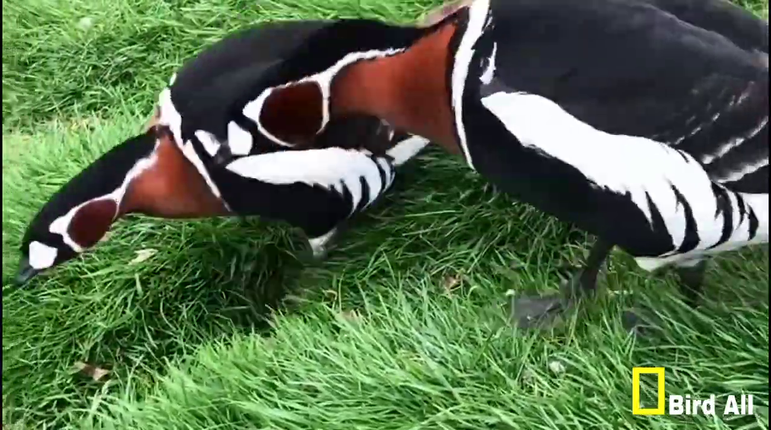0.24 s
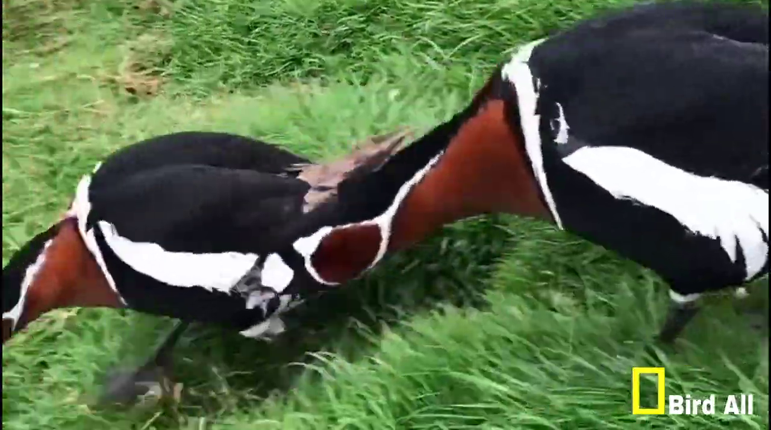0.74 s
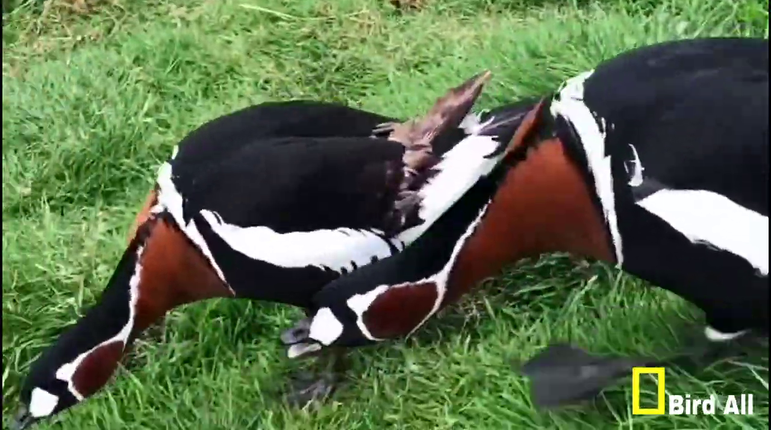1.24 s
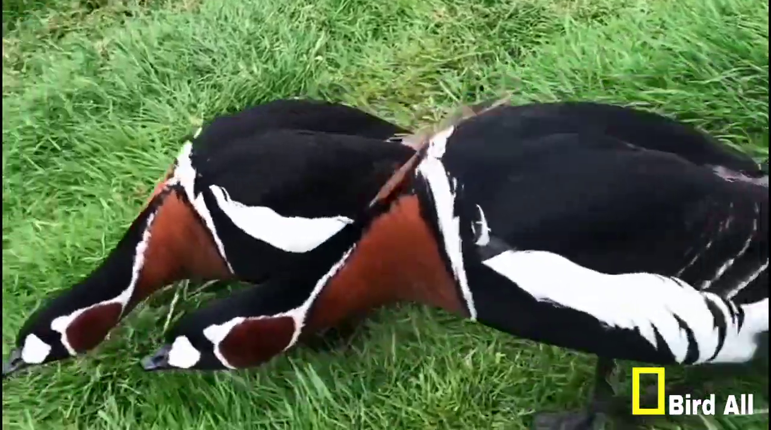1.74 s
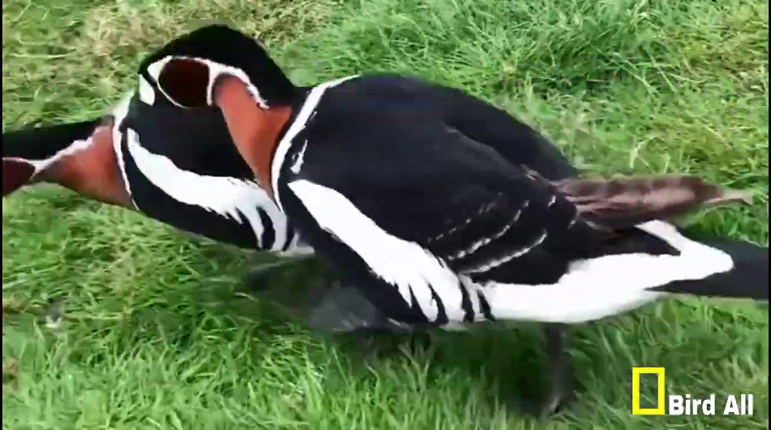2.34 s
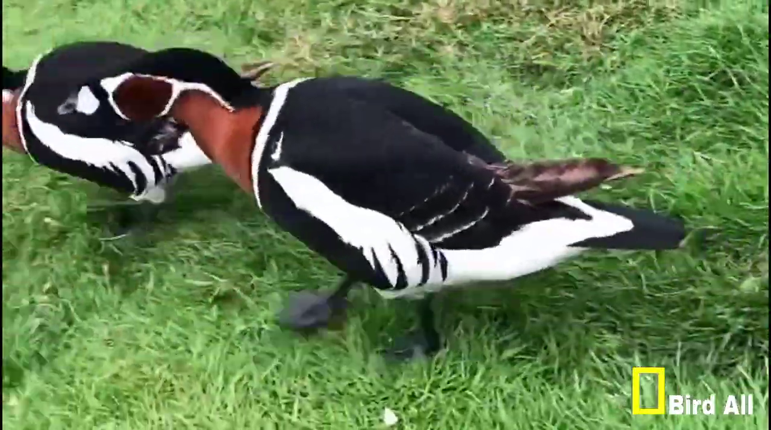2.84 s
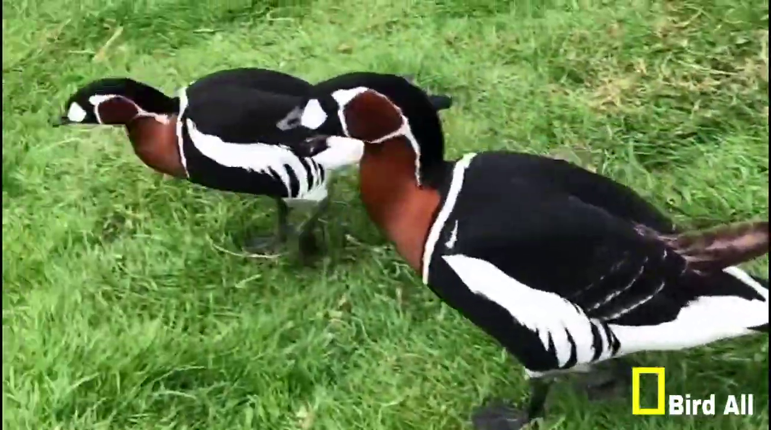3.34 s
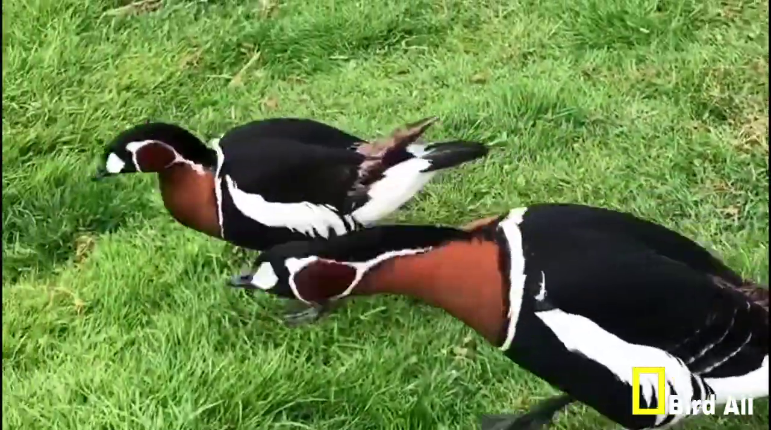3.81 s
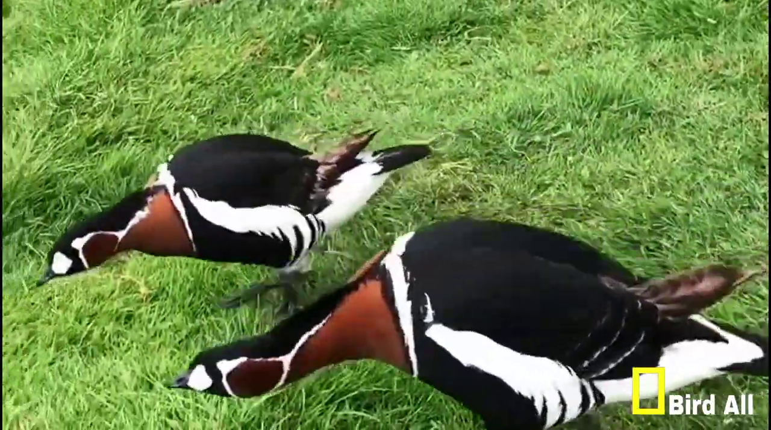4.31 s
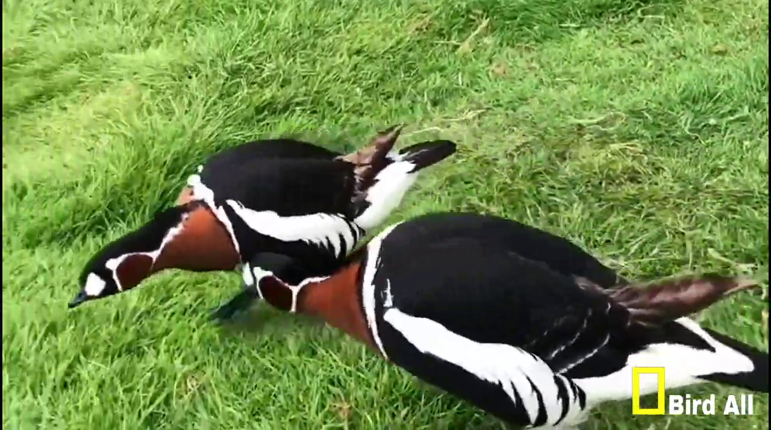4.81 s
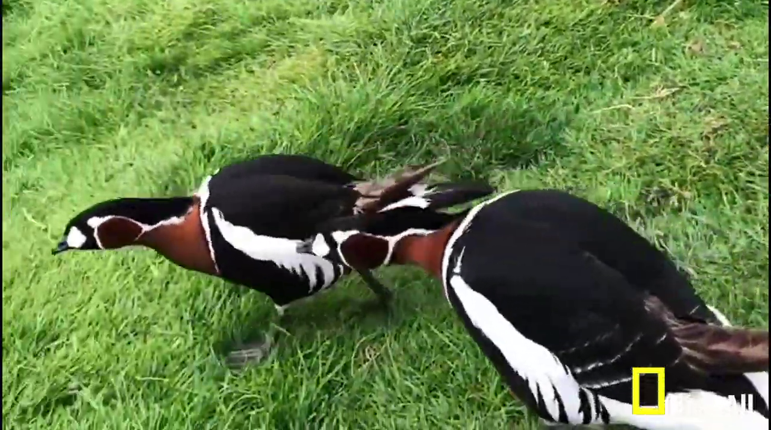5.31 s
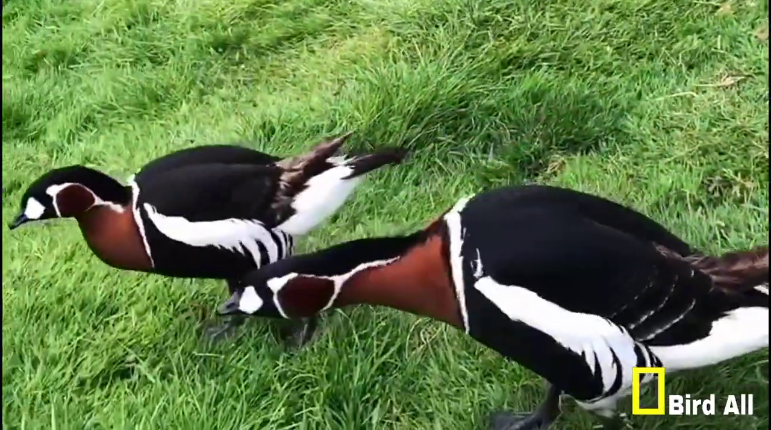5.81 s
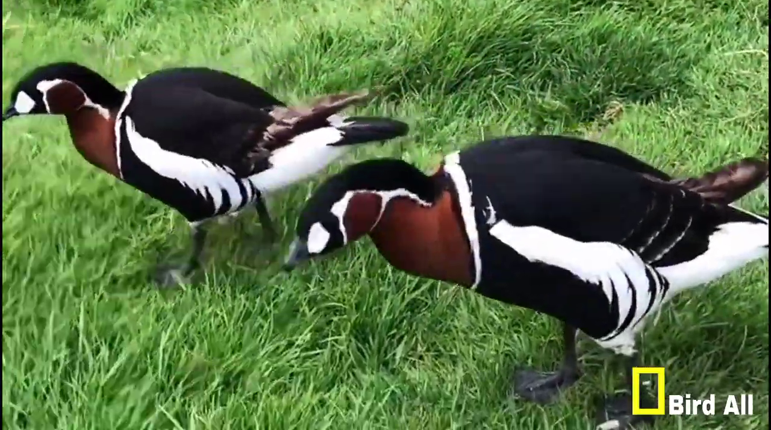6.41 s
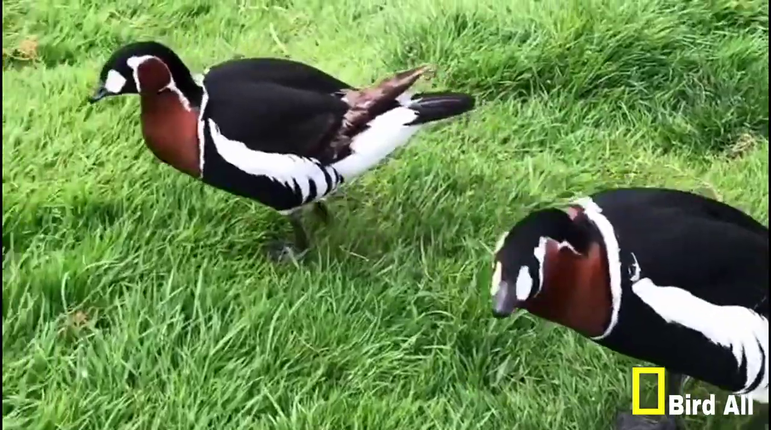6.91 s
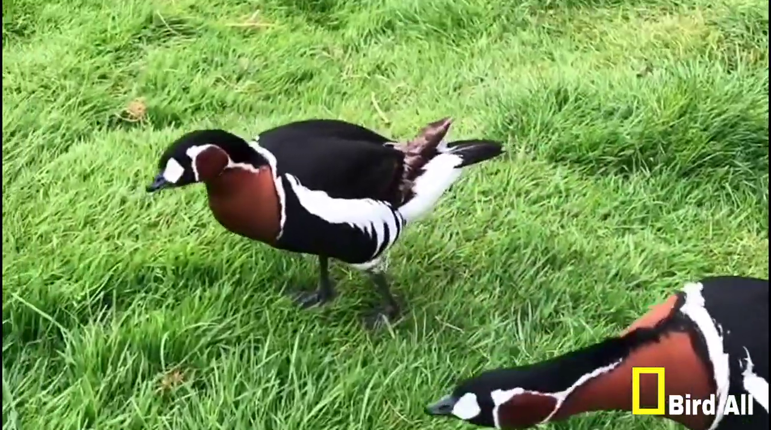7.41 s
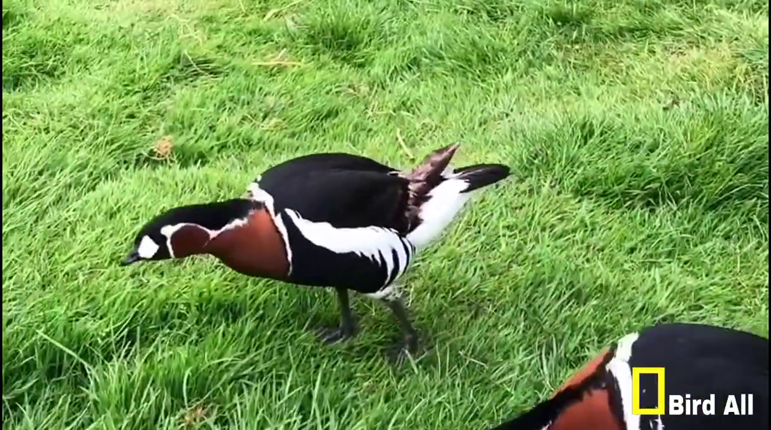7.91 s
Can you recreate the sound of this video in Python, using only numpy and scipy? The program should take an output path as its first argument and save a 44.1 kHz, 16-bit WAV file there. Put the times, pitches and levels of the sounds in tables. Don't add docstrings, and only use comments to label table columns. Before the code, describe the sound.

Sparse sharp goose yelps that break from buzz to falling whistle, low grunts and croaks answering, over distant traffic and woodland birdsong.

```python
import sys
import numpy as np
from scipy import signal
from scipy.fft import rfft, irfft, next_fast_len
from scipy.io import wavfile
from scipy.ndimage import uniform_filter1d

SR = 44100
rng = np.random.default_rng(int(sys.argv[2]) if len(sys.argv) > 2 else 0)


def inscribe(sig):
    pcm = np.round(np.clip(np.atleast_2d(sig).T, -1, 1) * 32767)
    wavfile.write(sys.argv[1], SR, pcm.astype(np.int16))


def amplitude_ratio(level_db):
    exponent = np.asarray(level_db, float) / 20
    return 10 ** exponent


N = 359415

# pitch_hz, level_db (per Hz)
TOWN_COLOUR = [(15, -34), (25, -35.5), (49, -11), (75, 5), (91, -5), (118, -8), (168, -8), (417, -19),
               (733, -19), (1640, -23), (4790, -22.5), (9110, -29.5), (11000, -31.5), (13600, -31.5),
               (15200, -58.5)]
# time_s, level_db
TWITTER_SWELL = [
    (0, -1.5),
    (.8, 4.5),
    (1, 7),
    (2.3, 9),
    (2.9, 3),
    (3.3, -2),
    (4.199, -3.5),
    (5.199, -2),
    (6.9, -2.5),
    (8.15, 4),
]
# start_s, level_db
TWO_NOTE_CALLS = [
    (1.39, -28.5),
    (1.575, -32),
    (1.765, -32),
]
# delay_s, length_s, start_hz, end_hz, level_db (relative), echo_db (relative)
FIRST_NOTE = (0, .035, 8080, 7840, -1.5, -15)
SECOND_NOTE = (.028, .08, 7690, 6680, 0, -8)
# start_s, length_s, start_hz, end_hz, level_db
CLIMBING_TRILL = [
    (2.072, .062, 3373, 3920, -35),
    (2.137, 0.062, 3456, 3850, -35.5),
    (2.204, 0.12, 3675, 4100, -37),
    (2.293, 0.037, 3935, 4013, -35.5),
    (2.387, .079, 3820, 4160, -42.5),
]
# start_s, length_s, start_hz, end_hz, level_db
DEEP_BIRDS = [(1.657, .057, 3070, 4700, -51), (1.855, .055, 3164, 4870, -43),
              (2.031, .041, 2985, 4000, -44.5), (.359, 0.31, 2226, 2650, -61.5),
              (.472, 0.28, 4630, 4340, -58.5), (.892, .09, 4160, 5210, -46.5),
              (2.147, 0.52, 2768, 2698, -56), (2.569, 0.061, 2790, 3285, -51),
              (2.76, 0.038, 4320, 3070, -49), (2.72, 0.054, 4660, 5120, -54),
              (3.45, 0.025, 3410, 2300, -60), (3.5, .07, 3130, 3300, -66), (2.849, .052, 6355, 6170, -60),
              (3.845, 0.2, 5530, 5380, -59), (4.079, 0.045, 6550, 6430, -59.5),
              (4.316, 0.24, 4400, 4730, -62), (5.042, 0.088, 6000, 5740, -62.5),
              (5.411, .03, 5050, 4700, -59.5), (6.348, 0.132, 2690, 2510, -62.5),
              (6.559, 0.09, 2110, 1975, -64.5), (7.034, 0.11, 2630, 3285, -54.5),
              (7.59, 0.061, 2147, 2130, -58), (7.607, 0.058, 3332, 3337, -52.5),
              (8.02, 0.074, 2650, 3090, -52.5)]
# start_s, length_s, start_hz, end_hz, level_db
EDGE_BIRDS = [(.448, .075, 7940, 5040, -56), (.497, .049, 5250, 4250, -51.5), (.85, .1, 3870, 3700, -35),
              (.99, 0.12, 4470, 4447, -32.5), (1.07, 0.22, 3547, 3580, -47.5),
              (2.79, 0.045, 3160, 3010, -44.5), (2.889, 0.022, 7606, 6500, -54),
              (4.5, 0.054, 6080, 5390, -56), (5.17, 0.04, 4680, 4600, -57), (5.82, 0.033, 6640, 5100, -57),
              (6.154, .049, 3890, 3907, -60.5), (6.158, 0.093, 2896, 2895, -63),
              (6.79, 0.115, 2307, 2000, -56.5), (7.12, 0.044, 5520, 6050, -57.5),
              (7.2, 0.12, 2800, 2550, -55), (7.207, 0.029, 1970, 1860, -57), (7.4, .073, 4200, 3970, -52),
              (8.08, 0.06, 4380, 4310, -55.5)]
# start_s, length_s, start_hz, end_hz, level_db
OPEN_BIRDS = [(.08, .037, 6540, 7970, -55), (.804, .096, 6440, 7710, -41.5), (1.354, .029, 8400, 7900, -39),
              (4.15, 0.034, 7400, 7540, -54), (4.84, .025, 4040, 3645, -53), (4.865, 0.03, 3620, 3725, -55),
              (5.059, 0.68, 6970, 7140, -58), (5.51, 0.038, 3850, 3885, -52),
              (5.558, .04, 8040, 7290, -59.5), (5.581, 0.062, 6840, 6840, -51.5),
              (5.728, .07, 7300, 6700, -55), (5.86, 0.038, 5100, 4780, -52), (5.91, .08, 4770, 5510, -54.5),
              (5.864, .055, 6940, 6350, -59), (5.96, 0.03, 3510, 4620, -58), (6.14, 0.07, 6940, 7030, -53),
              (6.22, 0.13, 7160, 7820, -56), (6.396, 0.0226, 4670, 5100, -53.5),
              (6.485, 0.022, 5920, 3680, -51.5), (6.504, 0.097, 3640, 3585, -58),
              (6.79, 0.0666, 6200, 5700, -56), (6.855, 0.041, 5450, 4970, -57),
              (5.85, 0.0377, 163, 147, -54.5), (8.086, 0.0326, 688, 680, -56)]
CHIP_TIMES = [5.838, 5.869, 5.903, 5.935]
# length_s, start_hz, end_hz, level_db
CHIP_SHAPE = (0.13, 4702, 4150, -60)
# pitch_hz, level_db
YELP_THROAT = [(350, -22), (600, -25), (1690, 5.5), (2640, -9), (3460, -3.5), (3950, -16.5), (4650, 0.5),
               (5040, -2.5), (8870, -17), (12800, -32.5), (15000, -41.5)]
# start_s, rasp_s, arch_s, slide_s, top_hz
ARCHED_YELPS = [
    (.777, .047, .055, 0.074, 1749),
    (3.731, 0.036, .051, .052, 1710),
    (7.295, .007, .041, .043, 1549),
]
# start_s, rasp_s, whistle_s, tail_s, lands_hz (after the step)
STEPPED_YELPS = [
    (1.264, .044, 0.053, 0.031, 1224),
    (4.185, .044, 0.038, 0.038, 1188),
    (4.923, .043, 0.04, .043, 1333),
    (7.819, .031, 0.025, 0.067, 1313),
]
# pitch_hz, level_db
GRUNT_THROAT = [(200, -0.5), (300, -5.5), (500, -13), (900, -9.5), (1400, -5.5), (1750, -3.5), (2400, -5.5),
                (3300, -18.5), (4100, -20.5), (5600, -16.5), (7100, -13), (9000, -19.5), (14000, -41.5)]
# start_s, rise_s, fall_s, top_flap_hz, level_db
CLEAR_GRUNTS = [
    (.915, .04, .1, 214, -36),
    (1.144, .07, 0.052, 231.6, -33.5),
    (1.568, .025, 0.11, 296, -27.5),
    (4.748, .034, .066, 304.5, -32),
    (7.72, .045, 0.055, 246, -37),
]
# start_s, rise_s, fall_s, top_flap_hz, level_db
HOARSE_CROAKS = [
    (3.96, 0.049, 0.16, 275.8, -32.5),
    (7.462, 0.065, 0.087, 265, -33),
]
# start_s, peak_db
FOOT_TICKS = [
    (2.372, -31.5),
    (2.689, -35.5),
    (6.1408, -58),
]
# start_s, length_s, whistle_hz, flap_hz, level_db
FAR_BARKS = [
    (2.866, 0.04, 970, 260, -51.5),
    (3.027, 0.063, 990, 263, -49.5),
    (3.171, 0.09, 1900, 260, -53.5),
    (3.261, 0.063, 1405, 240.6, -52.5),
    (3.438, 0.035, 1203, 271, -52.5),
    (3.663, 0.027, 1140, 260, -50),
]


def level(x, db):
    return x * amplitude_ratio(db) / np.sqrt(np.mean(x ** 2) + 1e-20)


def colour(table, hz):
    f, db = np.transpose(table)
    return np.interp(np.log(hz), np.log(f), db)


def walk(rate_hz, size=N):
    at = np.arange(size) * rate_hz / SR + rng.random()
    points = int(at[-1]) + 2
    return 1.297 * np.interp(at, np.arange(points), rng.standard_normal(points))


def add(out, start_s, x):
    i = int(start_s * SR)
    out[i:i + len(x)] += x[:N - i]


def echo(x, t60_s, rise_s):
    t = np.arange(int(t60_s * SR)) / SR
    tail = rng.standard_normal(len(t)) * amplitude_ratio(-60 * t / t60_s) * np.minimum(t / rise_s, 1)
    return signal.fftconvolve(x, tail / np.sqrt(np.sum(tail ** 2)))[:N]


def butter(x, order, hz, kind="low"):
    return signal.sosfilt(signal.butter(order, hz, kind, fs=SR, output="sos"), x)


def town():
    size = next_fast_len(N, True)
    hz = np.linspace(1, SR / 2, size // 2 + 1)
    white = rfft(rng.standard_normal((2, size))) * amplitude_ratio(colour(TOWN_COLOUR, hz))
    swell = walk(0.23)
    twitter_db = np.interp(np.arange(N) / SR, *np.transpose(TWITTER_SWELL))
    out = 0
    for centre_hz in 25 * 2 ** np.arange(0, 9.5, .5):
        band = np.cos(np.pi * np.clip(np.log2(hz / centre_hz), -.5, .5))
        drift_db = twitter_db * (2300 < centre_hz < 6500)
        moving_db = drift_db + .5 * swell + 1.1 * walk(2.1) + 1.0 * walk(9)
        out = out + amplitude_ratio(moving_db) * irfft(white * band, size)[:, :N]
    return out * amplitude_ratio(-51.5) / np.std(out[0])


def notes():
    calls = []
    for s, db in TWO_NOTE_CALLS:
        for delay_s, length_s, hz0, hz1, rel_db, echo_db in (FIRST_NOTE, SECOND_NOTE):
            calls.append((s + delay_s, length_s, hz0, hz1, db + rel_db, db + echo_db))
    chips = [(s, *CHIP_SHAPE) for s in CHIP_TIMES]
    groups = (CLIMBING_TRILL, -9), (DEEP_BIRDS, 0.5), (EDGE_BIRDS, -8), (OPEN_BIRDS + chips, -19)
    return calls + [(*row, row[-1] + echo_db) for rows, echo_db in groups for row in rows]


def crowd():
    chirps = []
    for s, d, f, g, b in rng.random((260, 5)):
        hz = 2800 + 4200 * f
        chirps.append((8 * s, .012 + .03 * d, hz, hz * (.65 + .7 * g), -74 + 11 * b, -76))
    return chirps


def songbirds():
    trees_t60_s, hedge_t60_s, near_t60_s = 2.06, 0.55, .07
    hedge_db = 1
    direct, fed = np.zeros(N), np.zeros(N)
    for s, length_s, hz0, hz1, direct_db, echo_db in notes() + crowd():
        u = np.linspace(0, 1, int(length_s * SR))
        hz = hz0 + (hz1 - hz0) * u
        flutter = walk(250, size=len(u))
        shape = np.minimum(1, np.minimum(u / .1, (1 - u) / .3)) * amplitude_ratio(3 * walk(60, size=len(u)))
        clear = shape * np.sin(2 * np.pi * np.cumsum(hz * (1 + .004 * flutter)) / SR)
        blurred = shape * np.sin(2 * np.pi * np.cumsum(hz * (1 + .011 * flutter)) / SR)
        add(direct, s, amplitude_ratio(direct_db + 3.5) * clear)
        add(fed, s, amplitude_ratio(echo_db) * blurred * np.sqrt(trees_t60_s / 7 / length_s))
    sides = []
    for _ in range(2):
        near = 0.55 * direct + .8 * echo(direct, near_t60_s, 0.00097)
        far = echo(fed, trees_t60_s, 0.017) + amplitude_ratio(hedge_db) * echo(fed, hedge_t60_s, .004)
        sides.append(near + far)
    return sides


def pipe(throat, hz):
    ripple_db, spacing_hz = 1.5, 847.3
    return amplitude_ratio(colour(throat, hz) + ripple_db * np.cos(2 * np.pi * hz / spacing_hz)) * (hz < .4 * SR)


def breath(throat, size):
    white = rfft(rng.standard_normal(size))
    return level(irfft(white * pipe(throat, np.linspace(1, SR / 2, len(white))), size), 0)


def syrinx(whistle_hz, flap_hz, rasp, throat, tilt_db, ring_ms, chest_db, breath_db):
    size = len(whistle_hz)
    flap = np.cumsum(flap_hz * (1 + .012 * walk(250, size=size))) / SR
    cycle = flap.astype(int)
    since = (flap - cycle) / flap_hz
    slack = np.clip((1550 - whistle_hz) / 350, 0, 1)
    free = np.cumsum(whistle_hz * (1 + (.003 + .022 * slack) * walk(500, size=size))) / SR
    opening = np.minimum(since / 0.0009, 1)
    closing = np.minimum((1 / flap_hz - since) / 0.00035, 1)
    puff = np.exp(-since / (ring_ms / 1000)) * opening * closing
    clean = chopped = 0
    for k in range(1, 17):
        hz = k * whistle_hz
        gain = pipe(throat, hz) * amplitude_ratio(tilt_db * np.log2(k))
        luck = rng.standard_normal((cycle[-1] + 1, 2))[cycle].T
        start = rng.random()
        waver = amplitude_ratio((1 + 3.5 * slack) * walk(130, size=size))
        clean = clean + gain * waver * np.sin(2 * np.pi * (k * free + start))
        ringing = np.sin(2 * np.pi * (hz * (1 + .012 * luck[1]) * since + start))
        chopped = chopped + gain * amplitude_ratio(1.7 * luck[0]) * ringing
    air = breath(throat, size)
    chopped = level(chopped * puff, 0) + level(air * puff, breath_db)
    chopped = butter(chopped, 4, 1000, "high") + amplitude_ratio(chest_db) * np.sin(2 * np.pi * flap)
    smooth = np.sqrt(uniform_filter1d(clean ** 2, int(.006 * SR)) + 1e-12)
    whistle = clean / smooth + amplitude_ratio(-21 + 8 * slack) * air
    return np.sqrt(rasp) * chopped + np.sqrt(1 - rasp) * whistle


def yelp(rasp_s, steps_s, hz, db, tilt_db, tail_s, slide_s):
    knee, knee_hz, end_hz = .62, 910, 720
    knee_drop_db, end_drop_db = -10, -28
    slide_tilt_db, end_tilt_db = -0.6, -3
    hold_s = max(tail_s - slide_s, 1e-4)
    slide_s = tail_s - hold_s
    at = np.cumsum([0, *steps_s, hold_s, knee * slide_s, (1 - knee) * slide_s])
    t = np.arange(0, at[-1], 1 / SR)
    hz = np.interp(t, at, [*hz, hz[-1], knee_hz, end_hz])
    tilt_db = np.interp(t, at, [*tilt_db, slide_tilt_db, slide_tilt_db / 2, end_tilt_db])
    db = [*db, db[-1], db[-1] + knee_drop_db, db[-1] + end_drop_db]
    gain = np.where(t < at[1], np.interp(t, at, amplitude_ratio(np.array(db))), amplitude_ratio(np.interp(t, at, db)))
    gain = gain * np.clip(np.minimum(t / 0.00033, (at[-1] - t) / 0.0022), 0, 1)
    rasp = np.interp(t, [rasp_s - .004, rasp_s + 0.0072], [1, 0])
    flap_hz = np.interp(t, [0, rasp_s], [260, 285.7])
    return gain * syrinx(hz, flap_hz, rasp, YELP_THROAT, tilt_db, ring_ms=1.9, chest_db=-23, breath_db=-9.5)


def arching_goose():
    attack_s, drop_s, lands_hz = .009, .007, 1313
    top_at = .7
    out = np.zeros(N)
    for s, rasp_s, arch_s, slide_s, top_hz in ARCHED_YELPS:
        effort = top_hz / 1720
        octaves = np.log2(effort)
        db = -10.5 - 7 * octaves
        steps_s = [attack_s, top_at * arch_s - attack_s, (1 - top_at) * arch_s, drop_s]
        hz = [top_hz * .86 * effort ** 1.8, top_hz * 0.94, top_hz, top_hz * .88, lands_hz]
        levels_db = [db - 20, db - 3.5 + 25 * octaves, db, db + 1.5, db - 1.5]
        tilts_db = [0, -1, -1, -2, -0.6]
        add(out, s, yelp(rasp_s, steps_s, hz, levels_db, tilts_db, slide_s, slide_s))
    return out


def stepping_goose():
    attack_s, break_s, drop_s, slide_s = .009, 0.0064, .005, .042
    whistle_hz, bulge_hz, sags_to_hz = 1711, 41, 1489
    out = np.zeros(N)
    for s, rasp_s, whistle_s, tail_s, lands_hz in STEPPED_YELPS:
        db = -7.5 + 60 * (whistle_s - .042)
        rasp_hz = 1970 + 6000 * (rasp_s - .043)
        land_db = -7.5 + 131 * (tail_s - .04)
        steps_s = [attack_s, rasp_s - attack_s - break_s / 2, break_s, whistle_s / 2, whistle_s / 2, drop_s]
        middle_hz = (whistle_hz + sags_to_hz) / 2 + bulge_hz
        hz = [rasp_hz] * 3 + [whistle_hz, middle_hz, sags_to_hz, lands_hz]
        levels_db = db + np.array([-20, -2.5, -2.5, -3, 0, -1, land_db])
        tilts_db = [1] * 3 + [1.5] * 2 + [-2] * 2
        add(out, s, yelp(rasp_s, steps_s, hz, levels_db, tilts_db, tail_s, slide_s))
    return out


def grunt(flap_hz, throat_hz, shake):
    size = len(flap_hz)
    flap = np.cumsum(flap_hz * (1 + shake * walk(200, size=size))) / SR
    stretch = 1750 / throat_hz * (flap_hz.max() / flap_hz) ** 0.14
    ring_db, ring_width_hz = 8, 230
    out = 0
    for k in range(1, 27):
        hz = k * flap_hz
        throat_db = colour(GRUNT_THROAT, hz * stretch if k > 2 else hz)
        gain = amplitude_ratio(throat_db + 2 * walk(50, size=size)) / (1 + (hz / 6500) ** 6)
        gain = gain * amplitude_ratio(ring_db * np.exp(-((hz * stretch - 1750) / ring_width_hz) ** 2))
        out = out + gain * np.sin(2 * np.pi * (k * flap + 0.12 * rng.standard_normal()))
    puffs = breath(GRUNT_THROAT, size) * np.exp(-(flap % 1) / .2)
    puffs = butter(puffs, 2, 2200, "high")
    return (level(out, 0) + level(puffs, -16)) * amplitude_ratio(1.8 * walk(180, size=size))


def grunts_and_croaks():
    linger_db = 21
    out = np.zeros(N)
    calls = [(*g, .006) for g in CLEAR_GRUNTS] + [(*c, .022) for c in HOARSE_CROAKS]
    for s, rise_s, fall_s, top_hz, db, shake in calls:
        t = np.arange(-rise_s, fall_s, 1 / SR)
        flap_hz = top_hz - np.where(t < 0, 16000, 8500) * t ** 2
        loss_db = np.where(t < 0, 3500, 1500 * (top_hz / 250) ** 8) * t ** 2
        loss_db = linger_db * np.tanh(loss_db / linger_db)
        edges = np.clip(np.minimum((t + rise_s) / 0.0041, (fall_s - t) / 0.0091), 0, 1)
        throat_hz = 1620 * (flap_hz / top_hz) ** .6 * max(top_hz / 268, 1) ** 1.6
        tired_shake = shake * (2.5 + (loss_db / 7) ** 2)
        add(out, s, amplitude_ratio(db - loss_db) * edges * grunt(flap_hz, throat_hz, tired_shake))
    return out


def ticks():
    out = np.zeros(N)
    for s, db in FOOT_TICKS:
        snap = np.diff(rng.standard_normal(400)) * np.exp(-np.arange(399) / 150.0)
        add(out, s, amplitude_ratio(db - 6.5) * snap)
    return out


def far_geese():
    out = np.zeros(N)
    for s, length_s, hz, flap_hz, db in FAR_BARKS:
        swell = np.hanning(int(length_s * SR)) ** 0.075
        steady = np.ones(len(swell))
        bark = syrinx(hz * steady, flap_hz * steady, 0.75, GRUNT_THROAT, -2.8,
                      ring_ms=1.5, chest_db=-36.5, breath_db=7)
        add(out, s, swell * amplitude_ratio(db) * bark)
    return echo(butter(out, 4, 2700), 0.2, 0.0023)


def scene():
    mid, side = town() + np.array(songbirds())
    side = amplitude_ratio(2) * butter(side, 3, 1900, "high")
    near = arching_goose() + stepping_goose() + grunts_and_croaks()
    trees = amplitude_ratio(-41) * echo(near, 0.75, .03)
    lawn = amplitude_ratio(-18.5) * echo(near, 0.09, 0.0027)
    mid = mid + near + trees + lawn + far_geese() + ticks()
    return np.array([mid + side, mid - side])


def gate(x):
    gate_db, mask_db, from_hz = -4, -21, 7400
    hz, _, z = signal.stft(x, SR, nperseg=1024)
    patch = uniform_filter1d(np.abs(z), size=5, axis=0)
    hiss = amplitude_ratio(gate_db) * np.median(patch, axis=1, keepdims=True)
    mask = amplitude_ratio(mask_db) * uniform_filter1d(patch, size=120, axis=0)
    keep = (patch > hiss + mask) | (hz[:, None] < from_hz)
    return signal.istft(z * keep, SR, nperseg=1024)[1][:N]


def roll_off(x):
    return signal.sosfilt(signal.butter(12, 15320, fs=SR, output="sos"), x)


def record(dry):
    dim_top = signal.ellip(6, .5, 14, 14050, fs=SR, output="sos")
    left, right = signal.sosfilt(dim_top, np.clip(dry, -1, 1))
    mid, side = gate((left + right) / 2), gate((left - right) / 2)
    return roll_off(np.array([mid + side, mid - side]))


dry = scene()
out = record(dry)
inscribe(out)
```